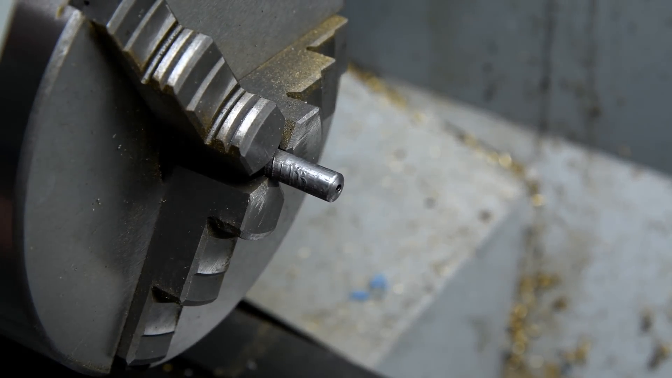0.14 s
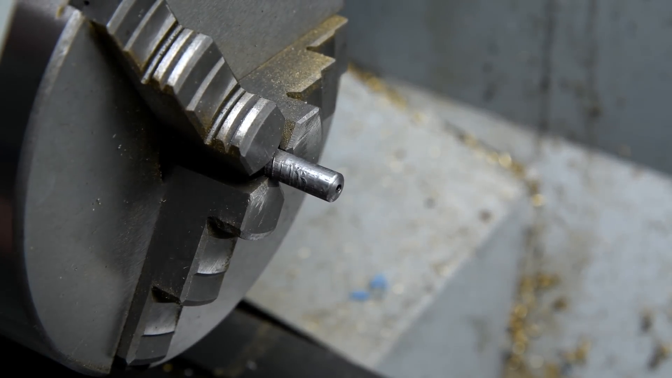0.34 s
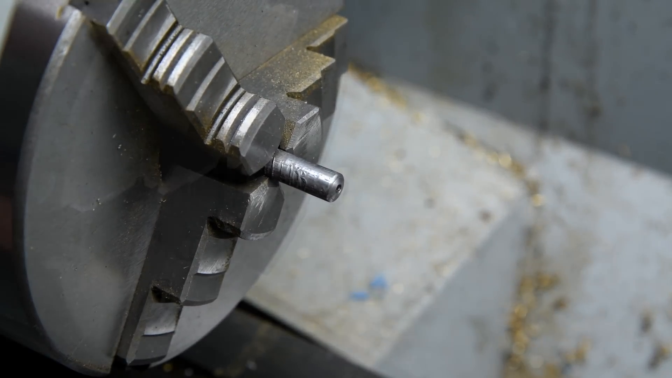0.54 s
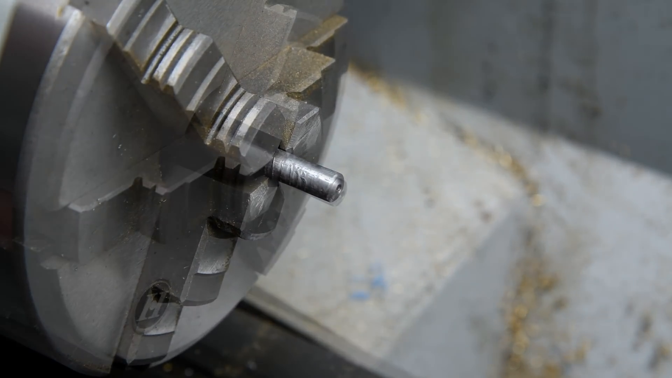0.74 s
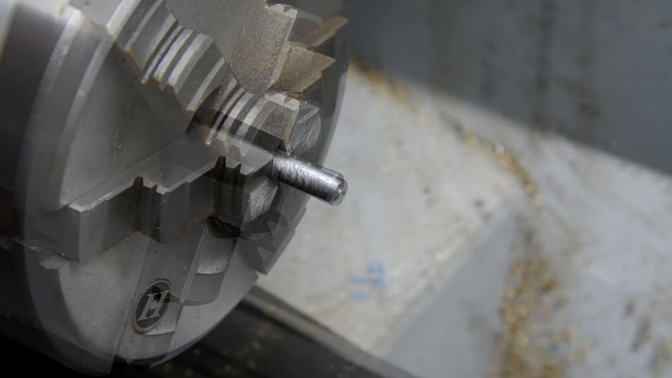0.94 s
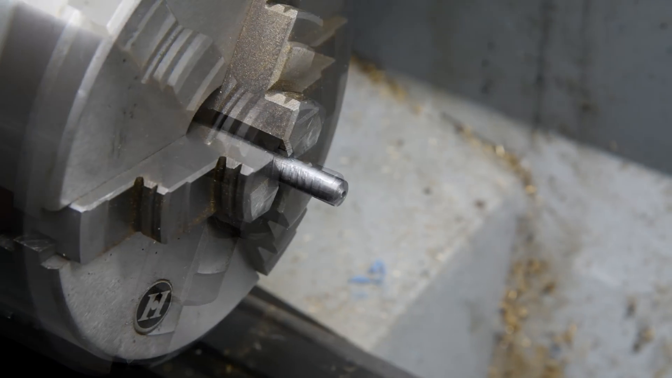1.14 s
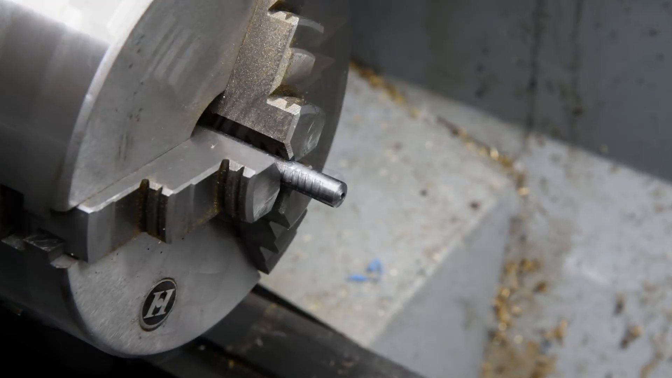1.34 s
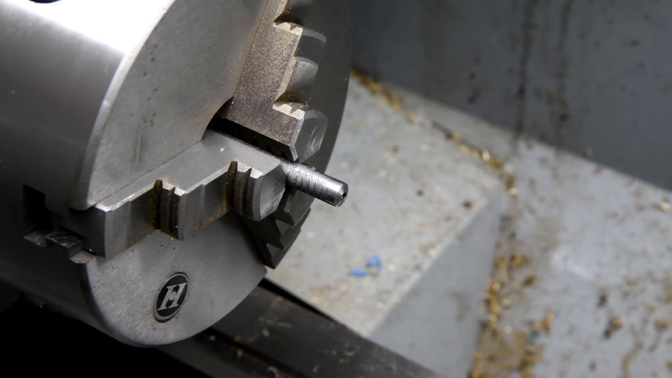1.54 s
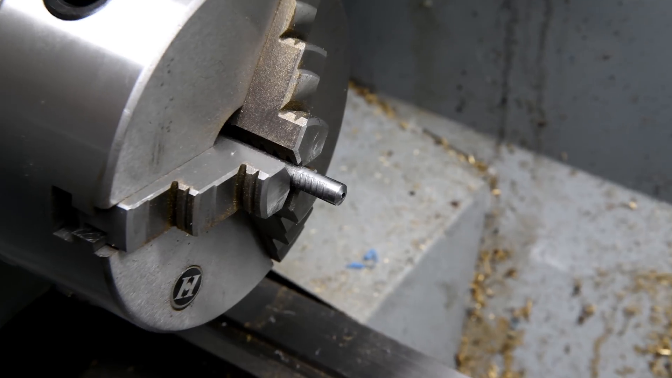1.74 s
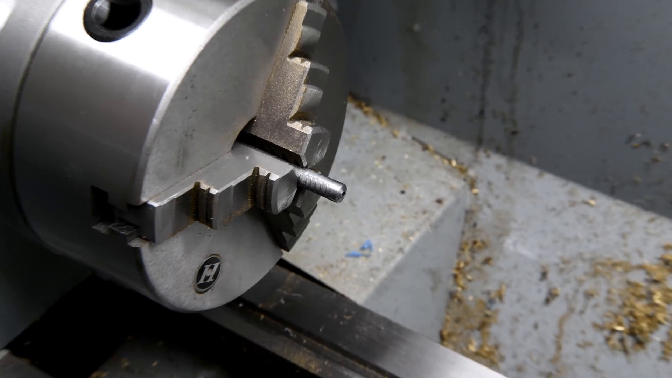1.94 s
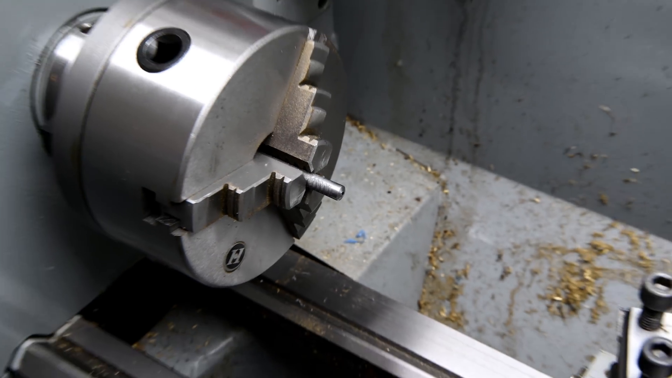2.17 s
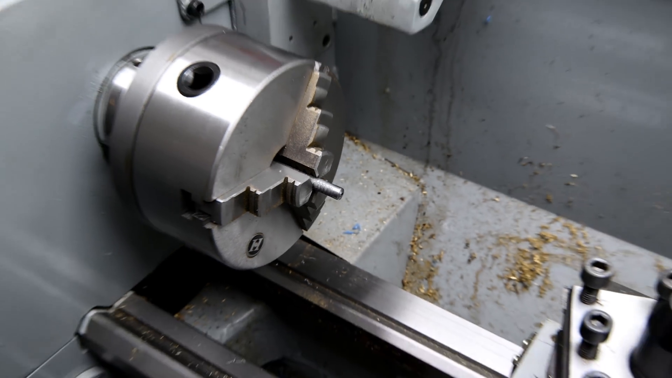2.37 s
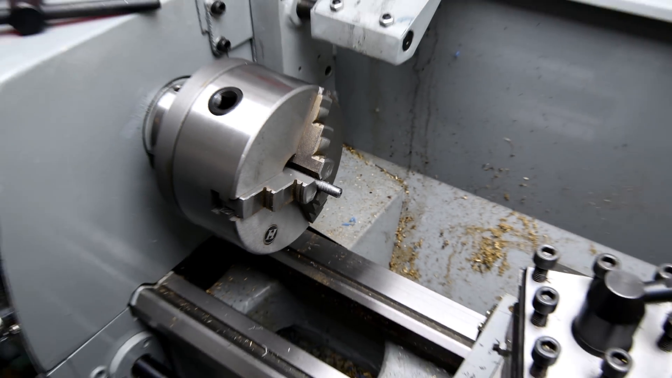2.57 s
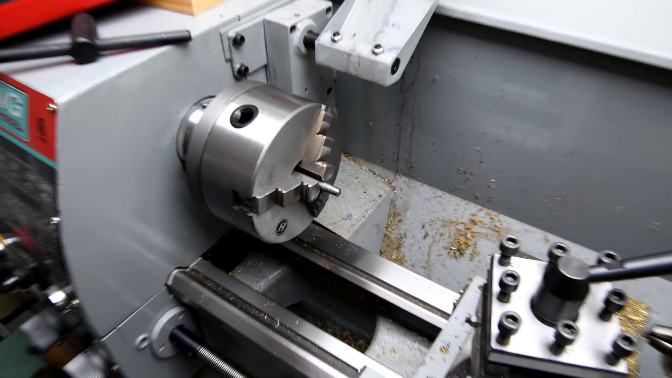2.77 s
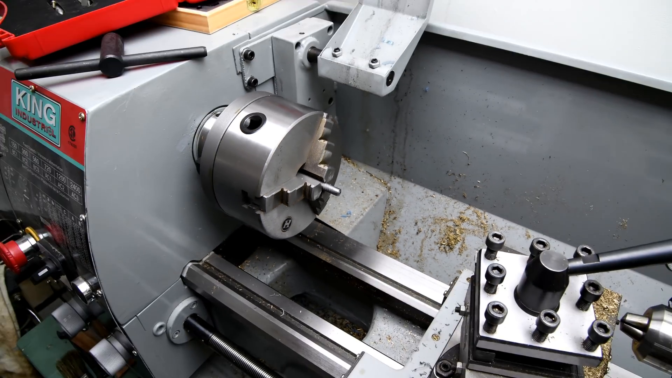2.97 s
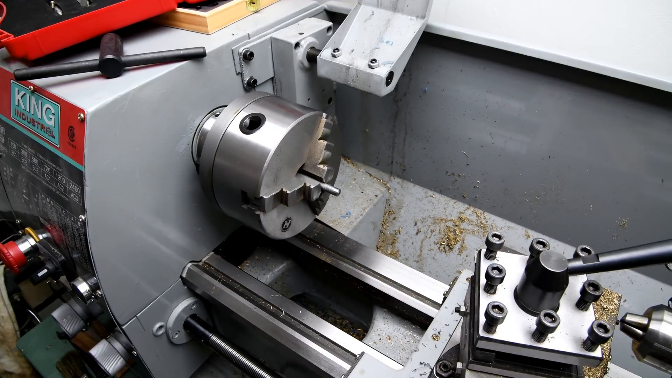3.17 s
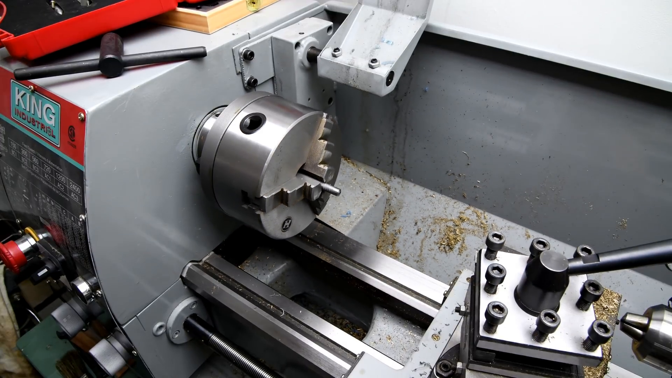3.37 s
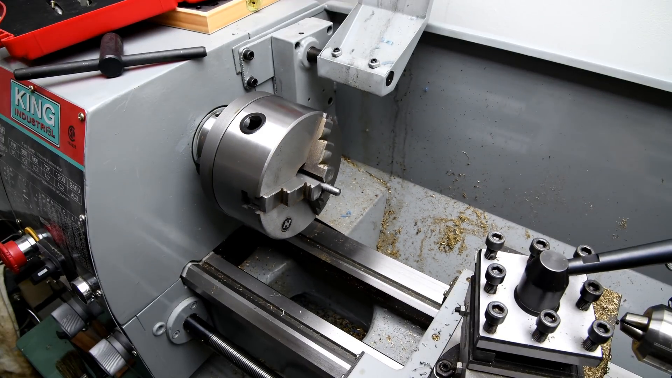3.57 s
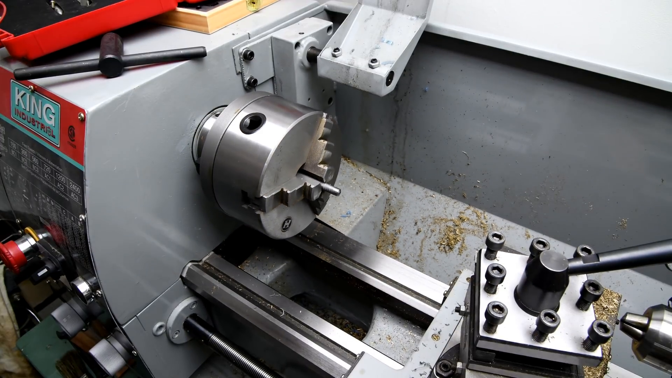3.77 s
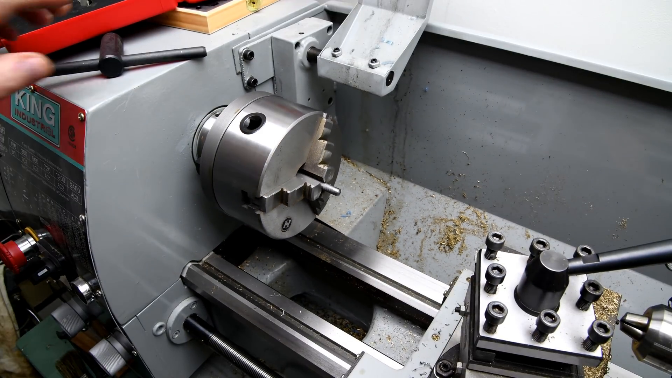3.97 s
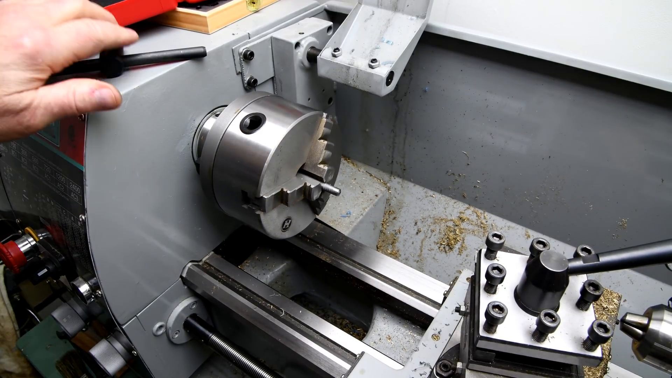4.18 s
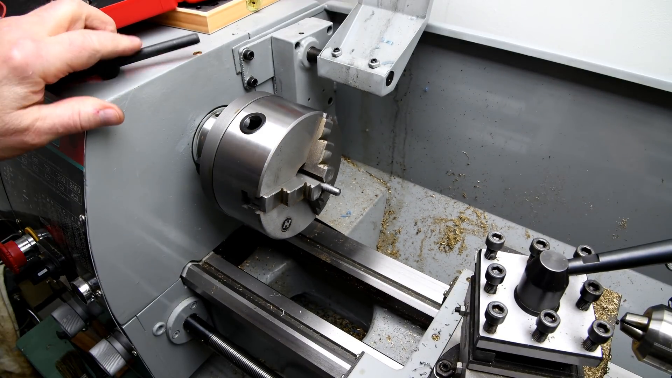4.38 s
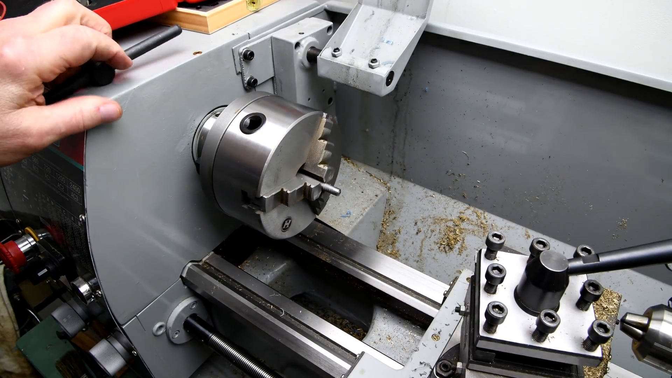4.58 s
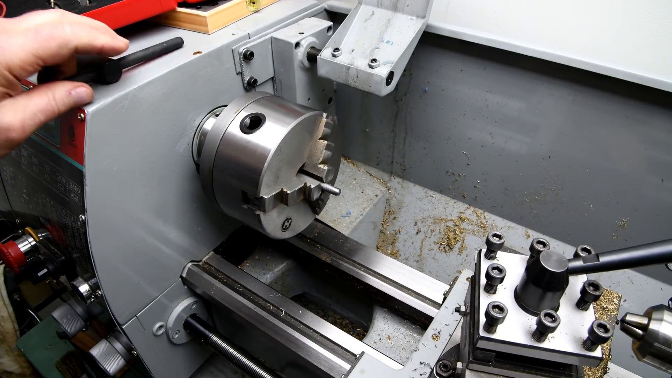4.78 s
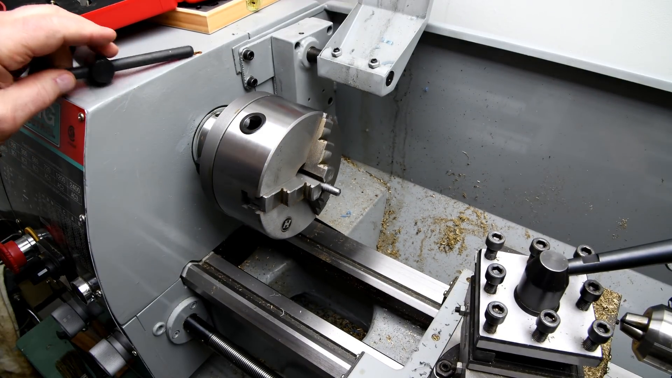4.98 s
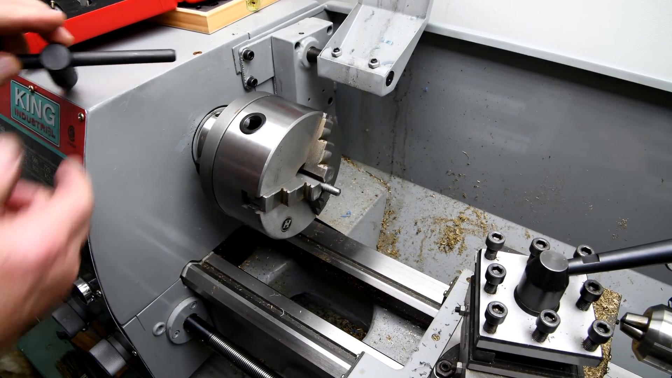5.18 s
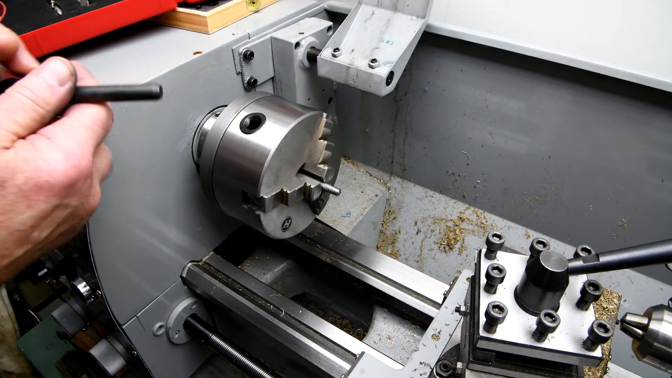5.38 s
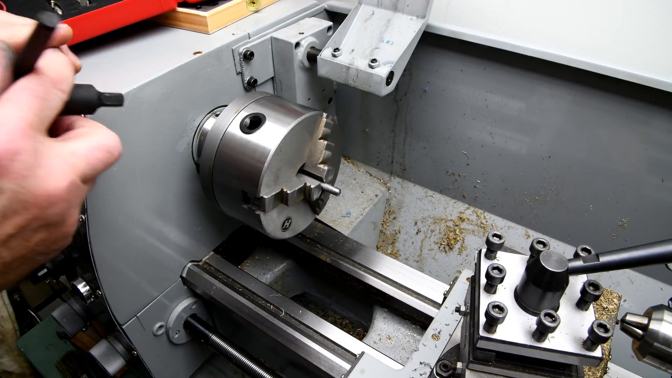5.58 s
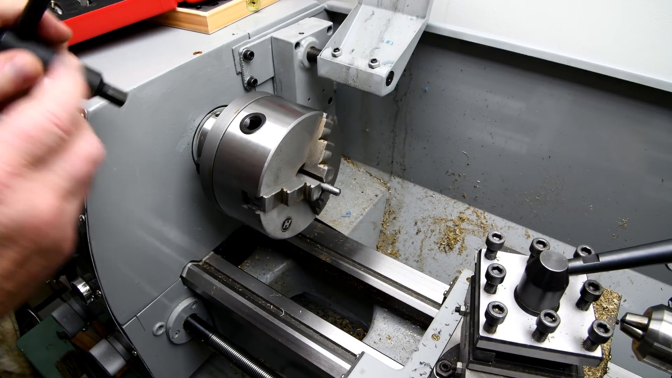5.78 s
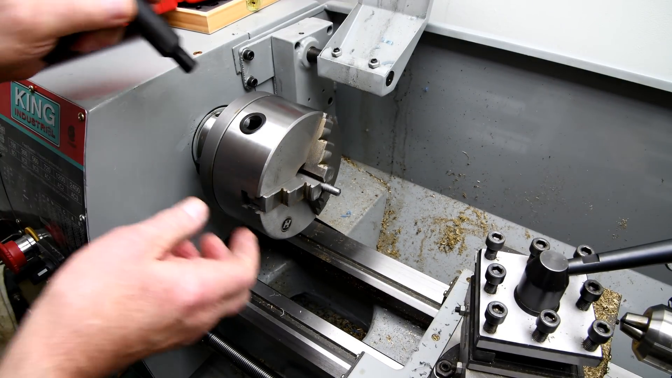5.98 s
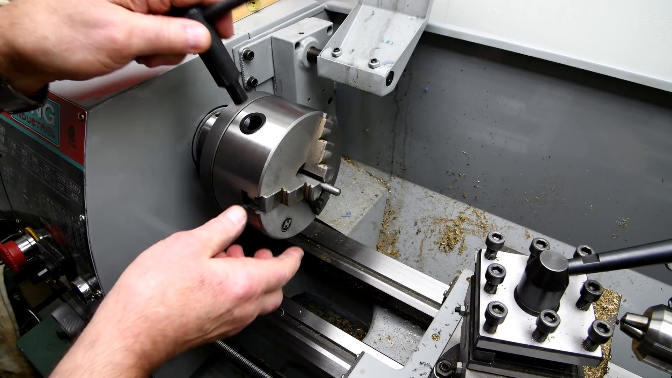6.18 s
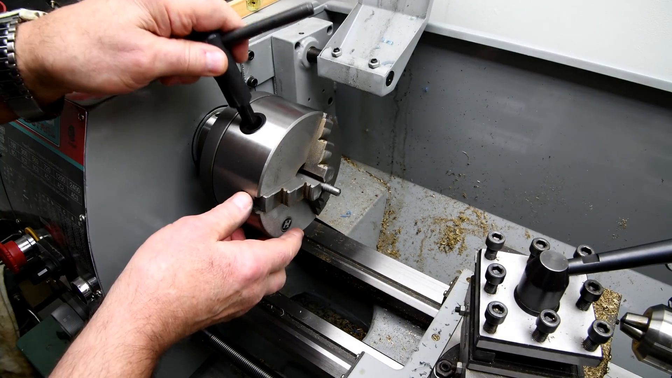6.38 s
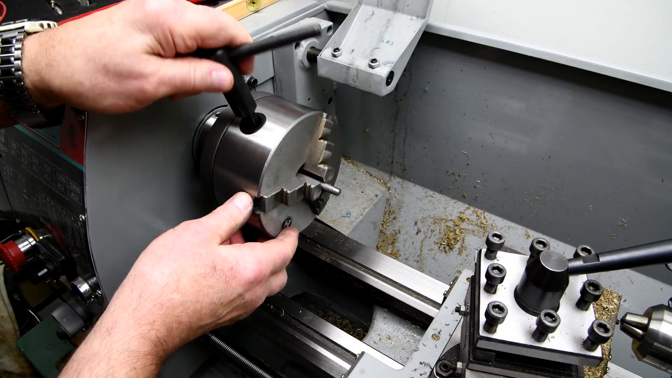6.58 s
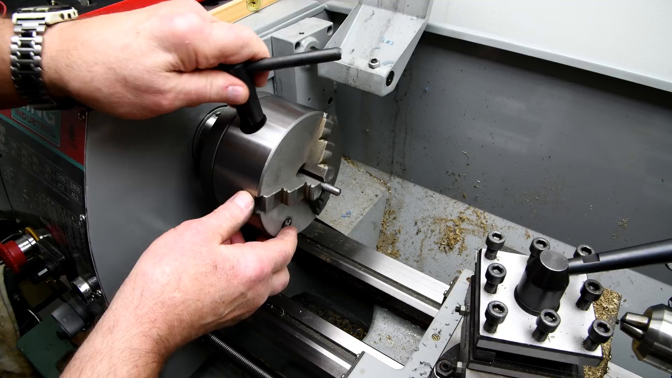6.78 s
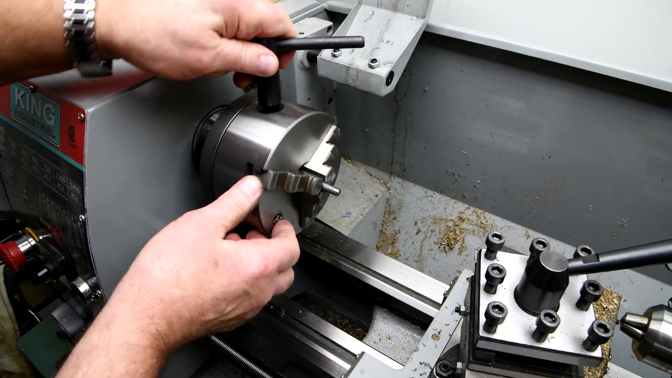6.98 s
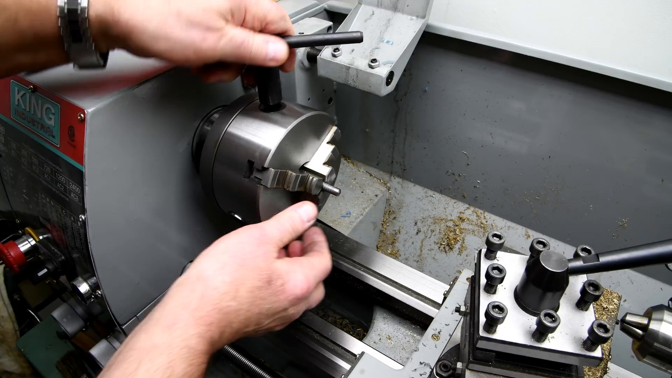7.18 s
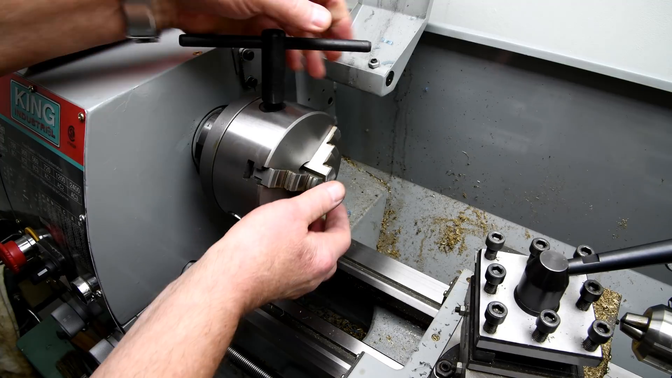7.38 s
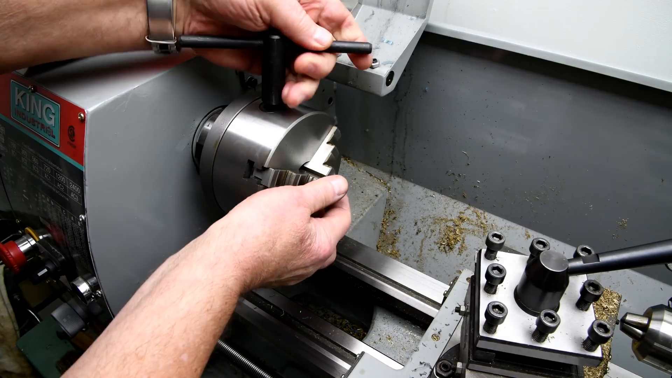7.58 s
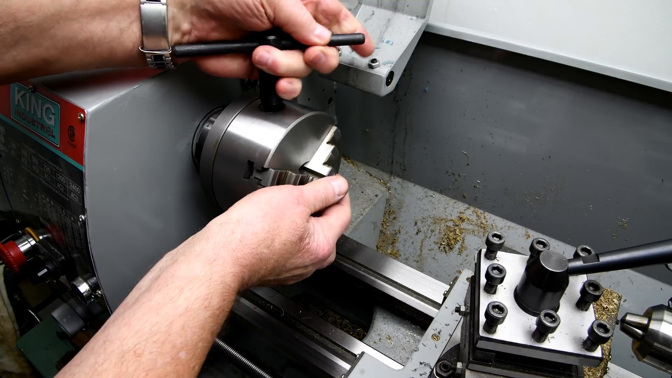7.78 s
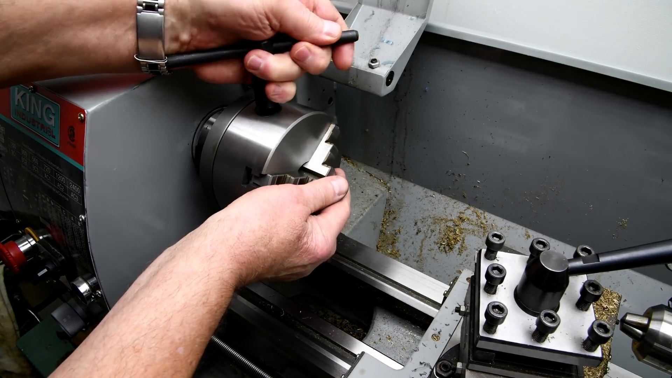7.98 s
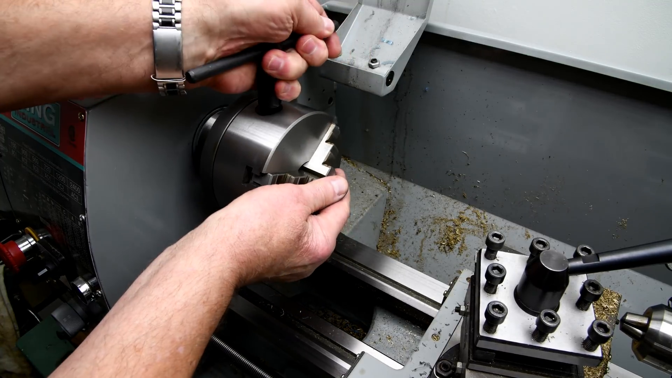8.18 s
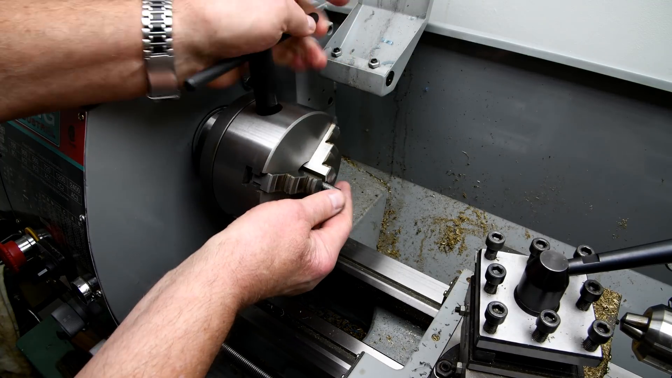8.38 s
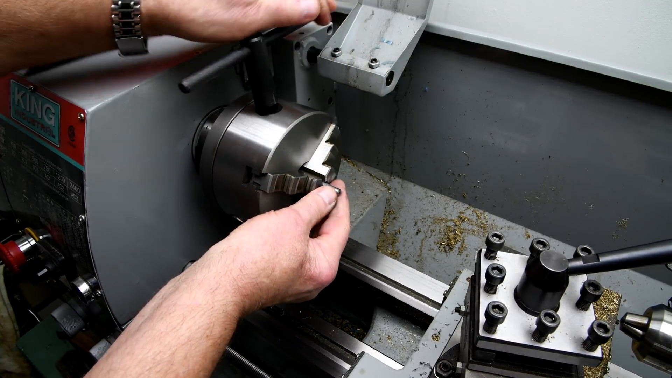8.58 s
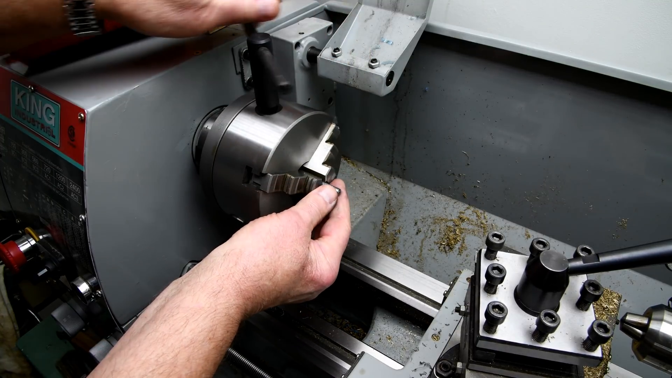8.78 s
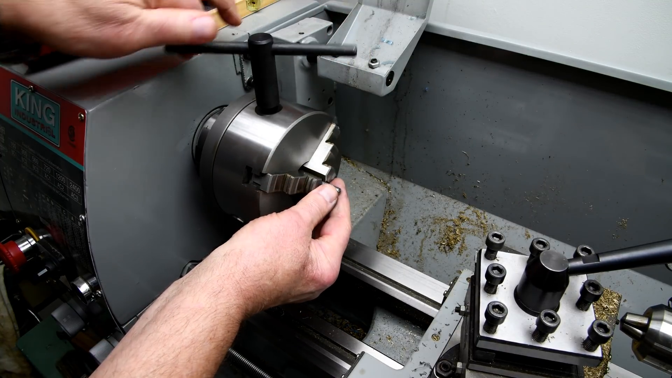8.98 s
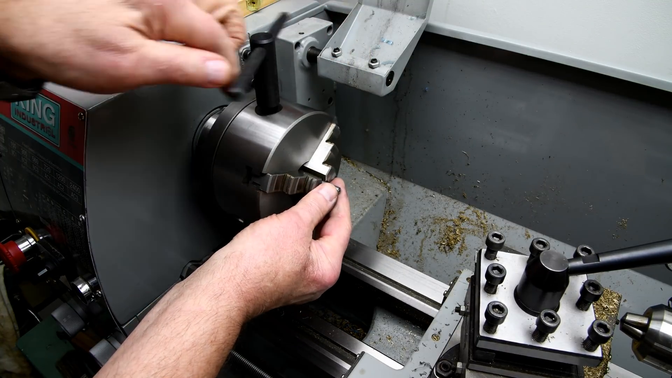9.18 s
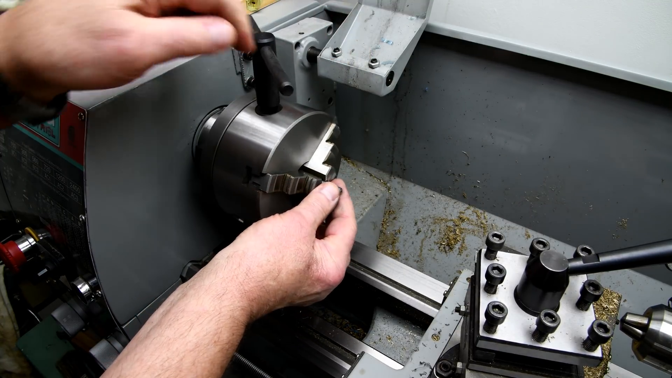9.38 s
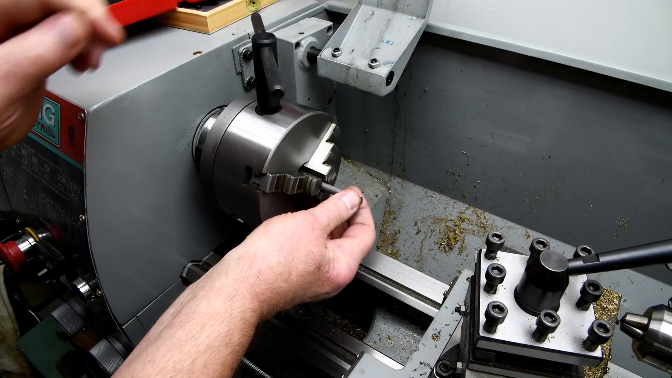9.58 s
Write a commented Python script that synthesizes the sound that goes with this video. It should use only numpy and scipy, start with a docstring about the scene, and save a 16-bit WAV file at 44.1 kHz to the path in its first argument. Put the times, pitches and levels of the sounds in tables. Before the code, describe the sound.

After faint hum, ticks and swelling hiss, hard metallic knocks ring from a thin machine cover, followed by bright steel clinks and low gear clunks.

```python
"""Chuck key at a lathe

A steel chuck key knocks on a lathe's sheet-metal cover, clinks into the chuck socket and is turned; a metal
watch band jingles. Struck modes and coloured noise bursts form knocks, handle rattle, clinks and gear thuds.
Fluttering noise forms drags, gear rumble, scroll scrape and, in smooth strokes, skin sliding on steel.
Beneath lie sine hum, noise air and hiss, regular ticks of short noise and one dry click of damped modes.
"""
import sys
import numpy as np
from scipy import signal
from scipy.fft import rfft, irfft, next_fast_len
from scipy.io import wavfile

SR = 44100
rng = np.random.default_rng(int(sys.argv[2]) if len(sys.argv) > 2 else 0)


def put_to_file(sound):
    """Save the sound as 16-bit audio at rate SR, in the file named by the first command-line argument."""
    columns = np.atleast_2d(sound).T  # one column per channel
    safe = np.clip(columns, -1, 1)
    whole_steps = np.round(safe * 32767)
    wavfile.write(sys.argv[1], SR, whole_steps.astype(np.int16))


N = 424683
BURST_SAMPLES = int(0.8 * SR)
AGE_S = np.arange(BURST_SAMPLES) / SR
TIME_S = np.arange(N) / SR
CUTOFF_HZ = 16000

# Spectra below: frequency_hz, density_db_per_hz; relative, as noise is normalised.
# hum lines: frequency_hz, rms_db
HUM_LINES = [(32.3, -68.5), (59.2, -60), (177.6, -69), (419.9, -64.5), (538.3, -78.5)]
# still air spectrum: frequency_hz, density_db_per_hz
AIR_SPECTRUM = [(12, -35), (20, -6), (65, 2), (86, -10), (182, -17), (204, -15.5), (248, -11), (377, -17.5),
                (422, -16.5), (590, -20.5), (1290, -19.5), (1610, -21), (2320, -23), (3160, -24),
                (16000, -26.5)]
# hiss spectrum: frequency_hz, density_db_per_hz
HISS_SPECTRUM = [(150, -4), (400, -5.5), (1000, -3), (1600, -6.5), (3000, -6.5), (6000, -12.5),
                 (12000, -13.5), (15500, -4.5)]
# soft rustles: start_s, end_s, level_db
RUSTLES = [(0, 0.185, -51.5), (.2, 0.562, -55), (1.141, 1.18, -46)]
AIR_DB = -54
SWELL_START_S, SWELL_CREST_S, SWELL_END_S = 1.35, 2.0, 2.97
SWELL_CREST_DB, SWELL_RISE_DB_PER_S, SWELL_FALL_DB_PER_S = -44.5, 17, 9
HISS_ATTACK_S, HISS_RELEASE_S = 0.0079, 0.019

# stereo likeness: frequency_hz, left_right_correlation
STEREO_LIKENESS = [(60, 0.91), (300, 0.91), (700, 0.81), (1300, 0.75), (2500, 0.28), (5000, 0.054),
                   (15000, 0.036)]
# room decay: frequency_hz, t60_s
ROOM_DECAY = [(150, 0.19), (500, 0.64), (2000, 0.28), (6000, 0.14), (15000, 0.23)]

# tick runs: start_s, end_s
TICK_RUNS = [(0.0365, 0.6), (1.3443, 9.6)]
# faint single ticks, one of them a weak beat: time_s, level_db
SINGLE_TICKS = [(0.1448, -55), (0.4397, -49.5), (0.8654, -52.5), (0.9847, -47), (3.1024, -50)]
# tick spectrum: frequency_hz, density_db_per_hz
TICK_SPECTRUM = [(300, -5), (900, -10), (1500, -3), (2400, -14.5), (3400, -0.5), (4500, 0.5), (5100, -3),
                 (5900, 6), (6800, -6), (7500, -1.5), (10000, -16), (14000, -4.5)]
TICK_PERIOD_S, TOCK_AFTER_S = 0.9525, 0.468
TICK_DB, TOCK_DB = -39.5, -43.5

# dry click modes: frequency_hz, level_db, t60_s
SNAP_MODES = [(145, -18, 0.037), (295, -20, 0.063), (1006, -8.5, .012), (1270, -8, 0.019),
              (2150, -4, 0.0076), (3200, -7, 0.018), (4200, -9, 0.0065), (4930, -5.5, 0.0033),
              (7100, -11.5, 0.01), (9700, -2.5, 0.0012), (14000, -8, 0.0026)]
SNAP_S, SNAP_DB, SNAP_TAIL_DB = 2.981, -8.5, -36

# pushes on the key: start_s, end_s, gear_rumble_db, scroll_scrape_db
TURNS = [(6.563, 6.66, -37, -45.5), (6.76, 6.972, -36, -48.5), (7.078, 7.216, -48.5, -71),
         (7.338, 7.745, -49.5, -55), (7.797, 7.98, -49.5, -70), (8.25, 8.57, -49, -55.5),
         (8.638, 8.793, -43.5, -57.5), (8.89, 9.38, -50, -55.5), (9.156, 9.323, -50.5, -59),
         (9.434, 9.63, -47.5, -63.5)]
TURN_ATTACK_S, TURN_RELEASE_S = 0.016, 0.09
# skin strokes: fastest_s, length_s, level_db
SKIN_SLIDES = [(4.612, 0.051, -59), (4.757, 0.12, -49), (5.714, 0.19, -52), (5.813, .07, -48),
               (6.74, 0.053, -51), (7.315, 0.17, -46), (7.814, 0.095, -42.5), (7.936, 0.058, -38.5),
               (8.408, 0.11, -39.5), (8.486, 0.12, -52), (8.723, 0.073, -47)]
# scroll scrape spectrum: frequency_hz, density_db_per_hz
SCRAPE_SPECTRUM = [(350, 0), (600, -2), (1320, -0.5), (1840, -1), (2830, -9), (3240, -8), (4790, -14),
                   (7000, -19), (9100, -54), (15400, -120)]
# skin on steel spectrum: frequency_hz, density_db_per_hz
SKIN_SPECTRUM = [(1500, -21), (2800, -6.5), (4800, -8), (8000, -6), (11000, 0.5), (13000, -2.5),
                 (15000, 9.5), (16000, 0)]

# gears taking up their play: time_s, level_db, pitch_hz
GEAR_THUDS = [(4.716, -28.5, 334), (4.849, -24, 521), (4.968, -33, 321), (5.039, -37.5, 326),
              (6.592, -42, 337), (6.755, -25.5, 390.5), (6.844, -20.5, 387), (6.866, -20.5, 244),
              (7.504, -29, 327), (7.578, -31, 463), (7.779, -35, 253.5), (7.838, -33.5, 336),
              (8.166, -24.5, 326), (8.224, -21, 245), (8.561, -28, 383), (9.613, -35, 344)]
# gearbox spectrum: frequency_hz, density_db_per_hz
GEARBOX_SPECTRUM = [(88, -11.5), (150, -14.5), (178, -3.5), (210, -11), (248, -1), (322, 2.5), (350, -7.5),
                    (383, 5), (435, -5.5), (469, 2), (578, -12.5), (708, -17.5), (900, -26), (1170, -63),
                    (1980, -120)]
GEARBOX_DB, BED_DB, BED_HZ = -6, -13.5, 87  # levels against the thud's own tone

# jaws shifting in their slots: time_s, level_db, pitch_hz
JAW_KNOCKS = [(6.7145, -42.5, 2700), (6.7573, -41, 2700), (7.009, -38, 1250), (7.331, -41.5, 1690),
              (7.831, -42.5, 990), (8.642, -45, 1795), (8.711, -46.5, 1680), (9.5688, -37, 1144),
              (9.592, -40.5, 1870)]
JAW_TONE_DB, JAW_TONE_T60_S = -6.5, 0.3

# handle bar hits: time_s, rattle_db, tone_db
BAR_HITS = [(4.813, -11, -29), (4.8414, -42, -39), (4.9095, -30.5, -27.5)]
# bar resonances: frequency_hz, width_hz, level_db
BAR_RESONANCES = [(1550, 130, -2), (1810, 47, -13), (2130, 52, -6), (2680, 11, -3), (4000, 190, -13),
                  (4990, 250, 0.5), (6000, 48, -10), (7600, 87, -3), (8140, 41, -19), (9140, 41, -16),
                  (10700, 55, -21), (13500, 54, -26)]
# bar rattle spectrum: frequency_hz, density_db_per_hz
BAR_RATTLE_SPECTRUM = [(500, -29), (1300, -16), (2100, 8.5), (4100, 4), (4550, -15), (5100, -0.5),
                       (6400, 2.5), (7050, -22), (7600, -2), (9100, -3.5), (9900, -14), (10800, -12),
                       (12800, -25), (15200, -2.5)]
# bar bending modes: frequency_hz, level_db, t60_s
BAR_BENDING_MODES = [(2030, -5, 0.13), (2195, 6, 0.11), (2320, -3, .12)]

# steel contacts, key, chuck and a jingling metal watch band: time_s, ring_db, ring_hz, body_db, edge_db
CLINKS = [(5.5383, -39, 8700, -82, -36), (6.5365, -10.5, 3730, -25, -23), (6.8428, -16, 3810, -30.5, -35),
          (6.8563, -19.5, 5390, -49, -21.5), (6.9385, -24.5, 8080, -54, -18.5),
          (7.034, -33, 9250, -43, -32.5), (7.1254, -39, 9440, -49.5, -38), (7.557, -28.5, 2430, -31, -57),
          (7.9516, -29.5, 6350, -57, -27.5), (7.9708, -29.5, 8700, -50.5, -34),
          (7.9857, -33.5, 7950, -57, -38), (8.1313, -28.5, 6130, -47, -27.5),
          (8.1394, -15, 7740, -36, -17.5), (8.147, -18.5, 5560, -29.5, -17),
          (8.1735, -17.5, 9200, -31, -27), (8.236, -26, 7300, -42.5, -32.5), (8.557, -37, 2820, -40, -57),
          (9.399, -33, 9250, -67, -33)]
# sharp ring of a contact: ring_hz_multiple, level_db, t60_s
BITE_MODES = [(0.742, -6.5, 0.033), (1, -2.5, 0.02), (1.09, -10.5, .018)]
# steel resonances: frequency_hz, width_hz, level_db
STEEL_RESONANCES = [(2700, 130, -9), (3790, 150, -20.5), (4370, 46, -11), (4490, 89, 19), (5600, 260, 16),
                    (6200, 15, 26), (8970, 210, 2), (10700, 16, -13), (11050, 170, 4), (11900, 42, 2),
                    (13500, 120, -7), (15500, 120, -10)]
# clink spectrum: frequency_hz, density_db_per_hz
CLINK_SPECTRUM = [(1200, -47), (2700, -2.5), (4000, 6), (5700, 2), (8000, 4), (11000, -75), (15000, -27)]
# bright contact edge spectrum: frequency_hz, density_db_per_hz
EDGE_SPECTRUM = [(5000, -30), (9200, 3.5), (10500, -0.5), (13000, 7), (15500, 4.5)]
# dull chuck body spectrum: frequency_hz, density_db_per_hz
CHUCK_SPECTRUM = [(200, -8.5), (400, 1.5), (720, -3), (980, 5.5), (1300, -0.5), (1900, 0.5), (2700, -1),
                  (5000, -14.5)]
# low chuck modes: frequency_hz, level_db, t60_s
CHUCK_MODES = [(1076, -10, 0.1), (1490, -7.5, 0.11), (2000, -9, 0.075)]
STEEL_DB = -10.5  # steel noise against the ring level

# key on the cover: time_s, clang_db, boom_db, panel_db, crack_db
KNOCKS = [(4.4499, -14.5, -13, -11.5, -17), (4.5103, -30, -19.5, -28, -30.5), (4.6496, -22, -31, -23, -23),
          (4.813, -18.5, -33, -26, -26), (5.0991, -17.5, -36, -10, -8.5), (5.3486, -14.5, -37, -9, -13)]
# low cover modes: frequency_hz, level_db, t60_s
BOOM_MODES = [(374, -49, 0.19), (458, -2, 0.14), (501.7, 7.5, 0.21), (546, -6, 0.4)]
# middle cover modes: frequency_hz, level_db, t60_s
PANEL_MODES = [(596, -7, 0.33), (804, -1, 0.27), (830, -5, 0.38), (857, -4.5, 0.31), (910, -17.5, 0.43),
               (944, 2.5, 0.17), (1011.6, 0.5, 0.3), (1046, -0.5, 0.31), (1090, 0, 0.11),
               (1090, -0.5, 0.23), (1246, -3.5, 0.23)]
# high cover modes: frequency_hz, level_db, t60_s
COVER_MODES = [(1416, -4, 0.3), (1477, 4.5, .2), (1542, 5, .2), (1652, 3.5, 0.56), (1668, 7, 0.19),
               (1840, 2, 0.18), (1934, -7.5, 0.15), (2220, -8, .18), (2350, -5, 0.23), (2640, 3, 0.16),
               (3000, -16, 0.18), (3120, -5, 0.27), (3440, -11, 0.13), (3920, -2, 0.14), (4770, -7, 0.17)]
# crowded upper cover modes, spectrum: frequency_hz, density_db_per_hz
CLANG_SPECTRUM = [(90, -17.5), (170, -12.5), (350, -10), (680, -4), (900, -0.5), (1300, -0.5), (1800, -1.5),
                  (2700, -6), (4000, -13), (7000, -21.5), (12000, -22)]
# contact crack spectrum: frequency_hz, density_db_per_hz
CRACK_SPECTRUM = [(1500, -44), (3000, -14), (6000, -1.5), (10000, -3), (12500, 5.5), (15500, 5)]
# cover decay: frequency_hz, t60_s
COVER_DECAY = [(200, .38), (1000, 0.43), (2500, 0.33), (6000, 0.26), (15000, 0.16)]
# key dragging over the cover: start_s, end_s, level_db
DRAGS = [(4.598, 4.631, -42), (5.268, 5.32, -49.5)]
COVER_MODES_DB = -9  # against the clang
DRAG_ATTACK_S, DRAG_RELEASE_S = 0.03, 0.028


def from_db(db):
    """Decibels to gain."""
    return 10 ** (np.asarray(db) / 20)


def at_hz(points, hz):
    """Read a curve on a log-frequency axis."""
    points = np.array(points)
    return np.interp(np.log(hz + 1e-9), np.log(points[:, 0]), points[:, 1])


def add(out, time_s, sound):
    """Mix a sound in at a time."""
    start = int(round(time_s * SR))
    out[:, start:start + sound.shape[1]] += sound[:, :N - start]


def held(start_s, end_s, attack_s, release_s):
    """Gain envelope: linear attack, hold, exponential release."""
    rise = np.clip((TIME_S - start_s) / max(attack_s, 1e-3), 0, 1)
    return rise * np.exp(-np.clip((TIME_S - end_s) / max(release_s, 1e-3), 0, 20))


def fade(t60_s):
    """Free decay after a blow."""
    return np.exp(-np.log(1000) * AGE_S / max(t60_s, 1e-3))


def build_up(time_constant_s):
    """Vibration needs a moment to spread through a body."""
    return 1 - np.exp(-AGE_S / max(time_constant_s, 1e-5))


def noise(spectrum, size=BURST_SAMPLES, peaks=(), peak_db=0):
    """Stereo noise of rms 1 with a colour and optional resonances; the treble is wider than the bass."""
    hz = np.fft.rfftfreq(size, 1 / SR)
    lift = 1
    for centre_hz, width_hz, db in peaks:
        lift = lift + from_db(peak_db + db) / (1 + ((hz - centre_hz) / width_hz * 2) ** 2)
    alike = np.clip(at_hz(STEREO_LIKENESS, hz), -1, 1)
    mid, side = np.exp(2j * np.pi * rng.random((2, len(hz))))
    stereo = np.sqrt(1 + alike) * mid + np.sqrt(1 - alike) * side * [[1], [-1]]
    x = irfft(from_db(at_hz(spectrum, hz)) * lift * stereo, size)
    return x / x.std()


def steady(spectrum, flutter_db=0, per_s=20):
    """Lasting noise whose level flutters at random."""
    knots_s = np.arange(int(TIME_S[-1] * per_s) + 2) / per_s
    flutter = np.interp(TIME_S, knots_s, rng.standard_normal(len(knots_s)))
    lasting = noise(spectrum, size=next_fast_len(N, True))[:, :N]
    return lasting * from_db(flutter_db * flutter)


def die_away(x, decay):
    """Each octave of a sound decays at its own rate."""
    centres_hz = np.geomspace(125, 16000, 8)
    log_hz = np.log(np.fft.rfftfreq(BURST_SAMPLES, 1 / SR) + 1)
    spectrum = rfft(x)
    out = 0
    for hz, share in zip(centres_hz, np.eye(len(centres_hz))):
        band = irfft(spectrum * np.interp(log_hz, np.log(centres_hz), share), BURST_SAMPLES)
        out = out + band * fade(at_hz(decay, hz))
    return out


def ring(modes):
    """Struck modes of alternating sign; higher ones reach the two ears less in step."""
    out = np.zeros((2, BURST_SAMPLES))
    for k, (hz, db, t60_s) in enumerate(modes):
        alike = np.clip(at_hz(STEREO_LIKENESS, hz), -1, 1)
        apart_rad = np.arccos(alike) / 2 * (-1) ** (k // 2)
        wave = np.sin(2 * np.pi * hz * AGE_S + apart_rad * np.array([[1], [-1]]))
        out += (-1) ** k * from_db(db) * fade(t60_s) * wave
    return out


def background():
    """Sine hum and still air; a hiss sets in, swells, sinks and stops, besides soft rustles of its colour."""
    hum = sum(np.sqrt(2) * from_db(db) * np.sin(2 * np.pi * (hz * TIME_S + rng.random()))
              for hz, db in HUM_LINES)
    since_s = TIME_S - SWELL_CREST_S
    slope_db = np.minimum(SWELL_RISE_DB_PER_S * since_s, -SWELL_FALL_DB_PER_S * since_s)
    swell = (SWELL_START_S, SWELL_END_S, SWELL_CREST_DB + slope_db)
    hiss = sum(from_db(db) * held(start_s, end_s, HISS_ATTACK_S, HISS_RELEASE_S)
               for start_s, end_s, db in RUSTLES + [swell])
    return hum + from_db(AIR_DB) * steady(AIR_SPECTRUM) + hiss * steady(HISS_SPECTRUM)


def workshop(x):
    """Diffuse echoes from the splash guard and the walls: decaying noise as impulse response."""
    onset = np.clip((AGE_S - 0.005) / 0.01, 0, 1)
    echoes = die_away(noise([(100, 0.0053), (16000, 0)]), ROOM_DECAY) * onset
    unit_energy = echoes / np.sqrt(np.sum(echoes ** 2) / 2)
    return signal.fftconvolve(x, unit_energy, axes=1)[:, :N]


def ticks():
    """A small mechanism's dry noise ticks: strong and weak beats in turn, two a second, and faint single ones."""
    out = np.zeros((2, N))
    beats = []
    for start_s, end_s in TICK_RUNS:
        for delay_s, db in ((0, TICK_DB), (TOCK_AFTER_S, TOCK_DB)):
            beats += [(s, db) for s in np.arange(start_s + delay_s, end_s, TICK_PERIOD_S)]
    for time_s, db in beats + SINGLE_TICKS:
        decay = fade(0.055) + from_db(-5) * fade(0.18)
        add(out, time_s, from_db(db) * noise(TICK_SPECTRUM) * build_up(0.00065) * decay)
    return out


def snap():
    """One hard, dry click at the microphone: well damped modes and a faint noise tail."""
    out = np.zeros((2, N))
    tail = from_db(SNAP_TAIL_DB) * noise(CHUCK_SPECTRUM) * fade(0.15)
    add(out, SNAP_S, from_db(SNAP_DB) * ring(SNAP_MODES) + tail)
    return out


def rubbing():
    """The scroll scrapes grainily under the jaws at each push; skin hisses over steel in swelling strokes."""
    scrape = sum(from_db(db) * held(start_s, end_s, TURN_ATTACK_S, TURN_RELEASE_S)
                 for start_s, end_s, _, db in TURNS)
    skin = sum(from_db(db) * np.exp(-np.minimum((2 * (TIME_S - fastest_s) / length_s) ** 2, 20))
               for fastest_s, length_s, db in SKIN_SLIDES)
    grainy_scrape = scrape * steady(SCRAPE_SPECTRUM, flutter_db=2.5, per_s=89)
    return grainy_scrape + skin * steady(SKIN_SPECTRUM, flutter_db=2.2, per_s=320)


def gears():
    """Headstock gear teeth thud at their own pitches and shake the bed; they rumble at each push on the key."""
    rumble = sum(from_db(db) * held(start_s, end_s, TURN_ATTACK_S, TURN_RELEASE_S)
                 for start_s, end_s, db, _ in TURNS)
    out = rumble * steady(GEARBOX_SPECTRUM, flutter_db=3.5, per_s=23)
    for time_s, db, hz in GEAR_THUDS:
        gearbox = from_db(GEARBOX_DB) * noise(GEARBOX_SPECTRUM) * fade(0.42)
        thud = (gearbox + ring([(hz, 0, 0.22)])) * build_up(0.0023)
        bed = ring([(BED_HZ, BED_DB, 0.35)]) * build_up(0.008)
        add(out, time_s, from_db(db) * (thud + bed))
    return out


def jaws():
    """The jaws shift in their slots with soft, dull knocks, each with a short tone of its own."""
    out = np.zeros((2, N))
    for time_s, db, hz in JAW_KNOCKS:
        knock = noise(CHUCK_SPECTRUM, peaks=[(hz, 0.22 * hz, 0)], peak_db=9) * fade(0.2)
        tone = ring([(hz, JAW_TONE_DB, JAW_TONE_T60_S)])
        add(out, time_s, from_db(db) * (knock + tone) * build_up(0.0015))
    return out


def handle_bar():
    """The free handle bar rattles in its hole: a bending tone under broad, damped resonances."""
    out = np.zeros((2, N))
    for time_s, rattle_db, tone_db in BAR_HITS:
        rattle = from_db(rattle_db) * noise(BAR_RATTLE_SPECTRUM, peaks=BAR_RESONANCES, peak_db=11.5)
        rattle = rattle * fade(0.22) * build_up(0.00086)
        tone = from_db(tone_db) * ring(BAR_BENDING_MODES) * build_up(0.0016)
        add(out, time_s, rattle + tone)
    return out


def clinks():
    """Key, chuck and watch band: a sharp ring pitched per contact, steel modes, duller body, bright edge."""
    out = np.zeros((2, N))
    for time_s, ring_db, ring_hz, body_db, edge_db in CLINKS:
        steel = from_db(ring_db + STEEL_DB) * noise(CLINK_SPECTRUM, peaks=STEEL_RESONANCES, peak_db=-12)
        steel = steel * (fade(0.053) + from_db(-8.5) * fade(0.1))
        bite_modes = [(ratio * ring_hz, mode_db, t60_s) for ratio, mode_db, t60_s in BITE_MODES]
        bite = from_db(ring_db) * ring(bite_modes)
        body = noise(CHUCK_SPECTRUM) * fade(0.18) + ring(CHUCK_MODES)
        body = from_db(body_db) * body * build_up(0.0014)
        edge = from_db(edge_db) * noise(EDGE_SPECTRUM, peaks=STEEL_RESONANCES, peak_db=0.5)
        edge = edge * fade(0.056) * build_up(0.00049)
        add(out, time_s, steel + bite + body + edge)
    return out


def cover():
    """The key drags and drops on the sheet cover; each knock has its own share of boom, ring, clang and crack."""
    drag = sum(from_db(db) * held(start_s, end_s, DRAG_ATTACK_S, DRAG_RELEASE_S)
               for start_s, end_s, db in DRAGS)
    out = drag * steady(CLANG_SPECTRUM, flutter_db=5, per_s=240)
    for time_s, clang_db, boom_db, panel_db, crack_db in KNOCKS:
        boom = from_db(boom_db) * ring(BOOM_MODES) * build_up(0.026)
        panel = from_db(panel_db) * ring(PANEL_MODES) * build_up(0.03)
        clang = from_db(clang_db + COVER_MODES_DB) * ring(COVER_MODES) * build_up(0.0073)
        crack = from_db(crack_db) * noise(CRACK_SPECTRUM) * build_up(0.0019)
        crowd = from_db(clang_db) * noise(CLANG_SPECTRUM) * build_up(0.001)
        add(out, time_s, boom + panel + clang + die_away(crowd + crack, COVER_DECAY))
    return out


def scene():
    """All sources at the lathe; clinks and cover knocks stir the room."""
    steel, sheet = clinks(), cover()
    echoes = workshop(from_db(-6) * steel + from_db(-15) * sheet)
    faint = background() + ticks() + snap()
    turning = rubbing() + gears() + jaws()
    return faint + echoes + turning + handle_bar() + steel + sheet


def record(dry, top=0.42):
    """The loudest peaks are rounded and the top is cut."""
    rounded = top * np.tanh(dry / top)
    low_pass = signal.ellip(12, 0.1, 70, CUTOFF_HZ, fs=SR, output="sos")
    return signal.sosfilt(low_pass, rounded)


dry = scene()
out = record(dry)
put_to_file(out)
```